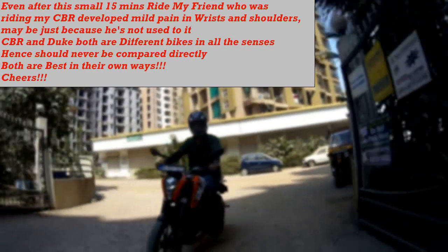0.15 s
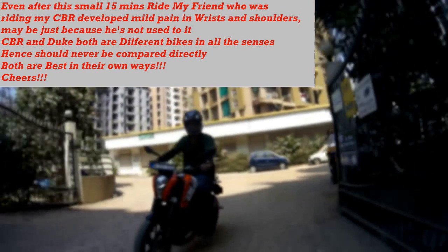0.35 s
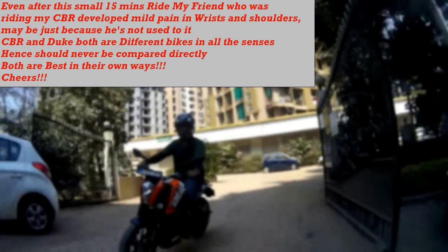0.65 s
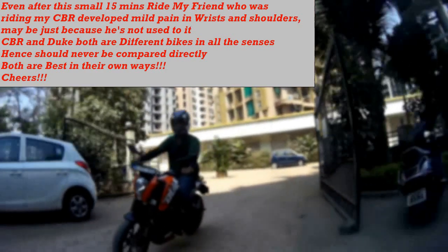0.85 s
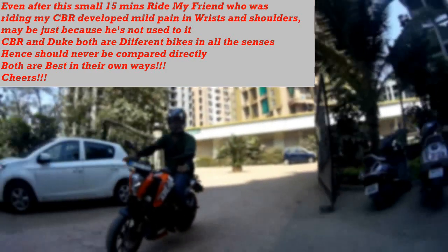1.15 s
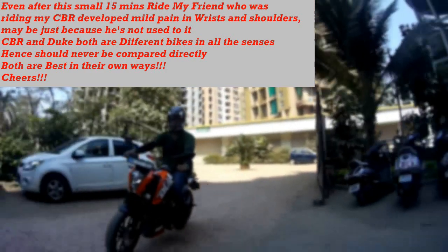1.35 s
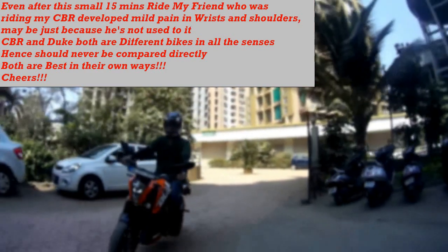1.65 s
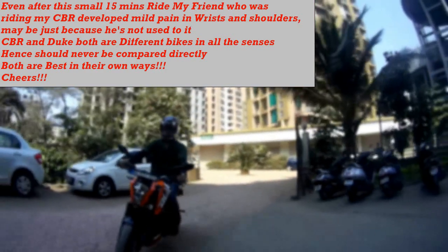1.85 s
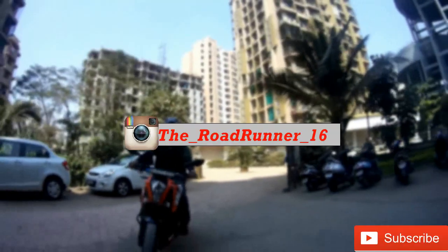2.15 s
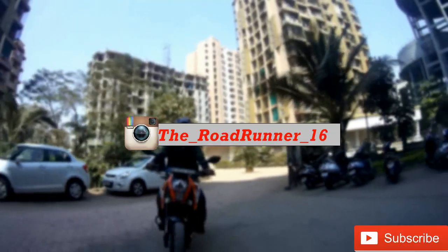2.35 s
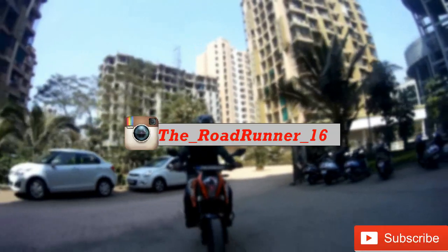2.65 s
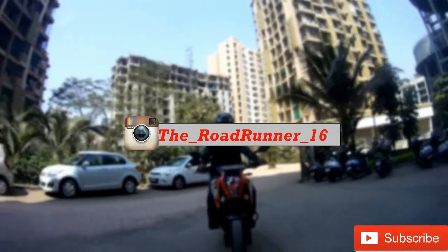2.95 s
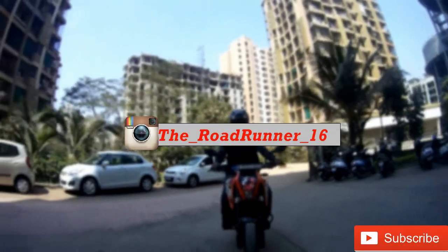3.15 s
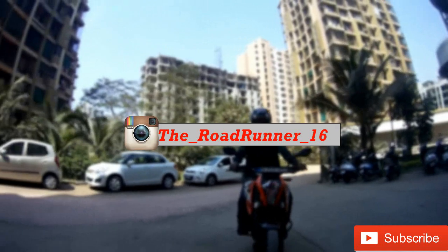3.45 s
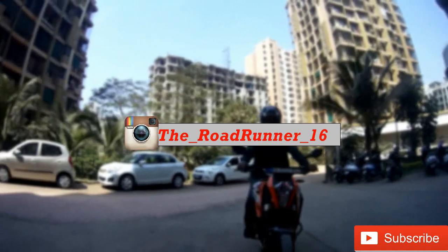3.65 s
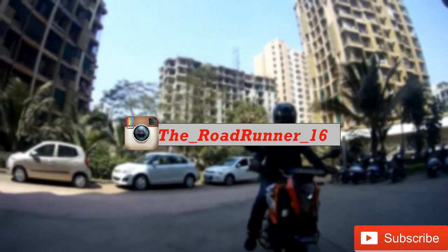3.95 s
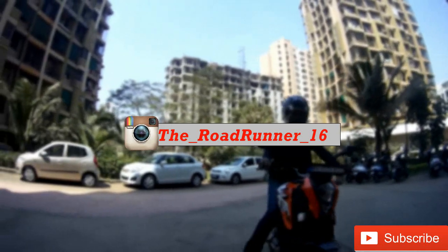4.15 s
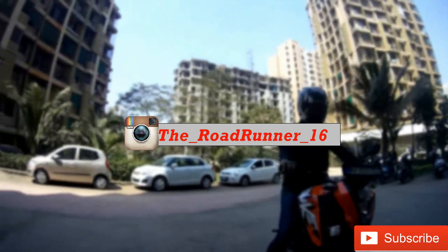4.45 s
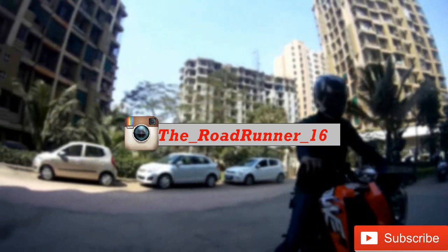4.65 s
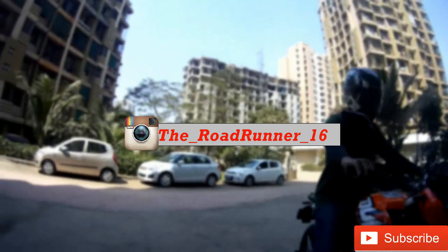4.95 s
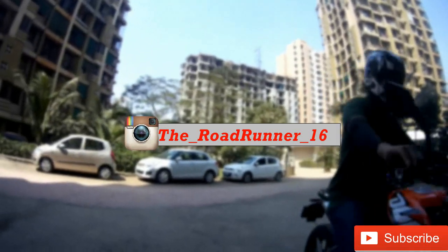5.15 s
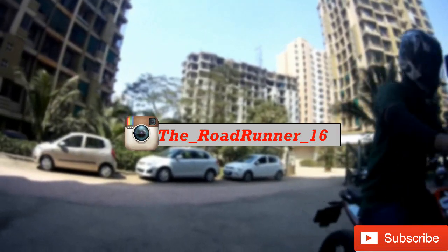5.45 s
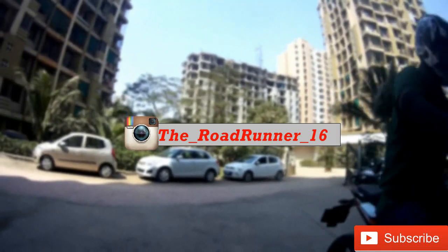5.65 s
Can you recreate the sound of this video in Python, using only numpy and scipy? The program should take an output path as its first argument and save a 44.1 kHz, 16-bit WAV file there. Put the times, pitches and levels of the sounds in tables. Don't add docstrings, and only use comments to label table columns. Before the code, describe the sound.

Very close, dull and boxy engine sound outdoors. Light throttle gives a full, rapid low drone with rattly buzz; the throttle closes and a smooth hum glides downward. Then a single-cylinder idle putters at under twelve beats a second, uneven in strength, with muffled mechanical clatter. Paving jolts rumble underneath, frequent at first and sparse later. Treble is weak, with only slight hiss.

```python
import sys
import numpy as np
from scipy import signal
from scipy.io import wavfile
from scipy.ndimage import uniform_filter1d

SR = 44100
rng = np.random.default_rng(int(sys.argv[2]) if len(sys.argv) > 2 else 0)


def volts(x):
    e = np.asarray(x, float) / 20
    return 10 ** e


def dump(signal):
    limited = np.clip(np.atleast_2d(signal).T, -1, 1)
    pcm = np.round(limited * 32767).astype(np.int16)
    wavfile.write(sys.argv[1], SR, pcm)


N = 255339

# (time [s], firing rate [1/s])
CRANK_SPEED = [(0.0, 26.79), (0.7, 28.33), (1.25, 19.07), (1.35, 14.94), (1.45, 12.67), (1.75, 11.99),
               (3.01, 11.44), (3.27, 11.97), (3.53, 11.3), (3.79, 11.71), (4.83, 11.41), (5.09, 11.74),
               (5.8, 11.57)]
# (time [s], share of the held opening [0-1])
THROTTLE_OPENING = [
    (0, 0.86),
    (.3, 0.89),
    (.7, 0.84),
    (1.0, 0.71),
    (1.15, 0.68),
    (1.3, 0.6),
    (1.6, 0),
    (1.9, 0.08),
    (5.79, 0.52),
]
# (time [s], level [dB])
FIRING_STRENGTH = [(0, 0.0), (1.2, -3), (1.5, 0), (2.0, 0.5), (2.6, -0.5), (3.45, -2.5), (3.8, 0),
                   (4.5, -2), (4.92, -4), (5.02, 0), (5.4, -1), (5.79, 2)]
# (frequency [Hz], sign [+-1], level [dB], t60 [s])
AIR_BOX_MODES = [(79.3, 1, -28.9, 0.397), (110.9, 1, -16.3, 0.228), (144.8, 1, -31, 0.384),
                 (200.0, -1, -13.7, 0.179), (238.2, 1, -2.8, 0.097), (250.7, -1, -4.4, 0.096),
                 (309.2, 1, -21.5, 0.197), (393.3, -1, -26.5, 0.36), (416.7, 1, -32.2, 0.4),
                 (501.5, -1, -23.5, 0.399)]
# (frequency [Hz], sign [+-1], level [dB], t60 [s])
PIPE_MODES = [(56.6, -1, -52, .4), (93.5, 1, -33.6, .34), (119, -1, -43.5, .4), (228, -1, -22, .025),
              (251, 1, -20.8, .173)]
# (frequency [Hz], sign [+-1], level [dB], t60 [s])
TAIL_MODES = [(170, -1, -35, .06), (293, 1, -27, .047), (325, 1, -37.5, .2), (364, 1, -38, .16),
              (413, -1, -28.7, .2), (473, -1, -24.4, .082), (524, -1, -41, .16), (652, -1, -50, .2),
              (955, -1, -39.5, .033), (1262, 1, -45, .07)]
# (frequency [Hz], sign [+-1], level [dB], t60 [s])
HEAD_MODES = [(1086, 1, -48.5, 0.15), (1333, -1, -43, 0.055), (2022, 1, -43, 0.015),
              (2310, -1, -45.5, 0.015), (4030, -1, -70.5, .012)]
# (frequency [Hz], width [Hz], level [dB])
CASE_MODES = [(109, 56, -8.5), (147, 13, -5.5), (194.6, 22, -3), (239.3, 19.7, 6.5), (301, 66, -6.5),
              (425.7, 62.4, 3), (501.7, 80.7, -0.5), (565, 278, -16.5), (714, 47, -8.5), (800, 70, -26.5),
              (1048.6, 133, -10), (1262, 66, -12), (1336, 56, -13.5), (1566, 180, -29.5), (1992, 222, -27),
              (2262, 94, -29.5), (2496, 180, -39.5), (2878, 44, -42), (2970, 41, -45), (3473, 130, -59.5),
              (2980, 490, -57.5), (4030, 410, -61), (4420, 100, -52.5), (5200, 250, -62.5)]
# (frequency [Hz], width [Hz])
CASE_NOTCHES = [(1165, 45), (1455, 60), (2075, 40)]
# (position [share of cycle], level over steady rush [dB], decay [share of cycle])
CLATTER_BURSTS = [
    (.92, 2, .1),
    (.09, 0, .05),
    (.41, -1, .08),
    (.97, -6, .5),
]
# (time [s], peak level [dB])
LONE_TICKS = [
    (1.1099, -49),
    (1.1887, -50),
    (1.3568, -52),
    (1.5509, -53),
    (1.5554, -54),
    (1.8801, -47),
]
# (time [s], length [s], mount rocking level [dB], frame shudder level [dB])
PAVING_JOLTS = [(.08, 0.14, -37, -34.5), (0.366, .36, -31, -40), (0.855, 0.2, -37.5, -38.5),
                (1.051, 0.25, -31.5, -33.5), (1.3, 0.2, -39, -29.5), (1.534, 0.45, -32, -27),
                (2.12, 0.22, -38, -33), (2.56, 0.37, -37, -30), (2.95, 0.44, -40, -32.5),
                (3.505, 0.2, -51, -41), (4.55, 0.15, -51, -43), (5.0, 0.17, -57, -39)]

FIRST_FIRING = -.085
IDLE_PER_S = 11.6
RUN_IN = 8000
INTAKE_LEAD_S, VALVE_LEAD_S, KNOCK_LEAD_S, TAIL_LEAD_S = .016, .0101, .0055, .0023
DRONE_IDLE_DB, DRONE_OPEN_DB = -45.5, 7.5
BUZZ_IDLE_DB, BUZZ_OPEN_DB = -82.5, -49
EXHAUST_IDLE_DB, EXHAUST_DB_PER_OCTAVE = -2.5, 3.5
SMOOTHED_DB, SMOOTHED_FROM = -16, .72
CLATTER_IDLE_DB, CLATTER_DB_PER_OCTAVE = -37, 2.5
CLATTER_FOLLOWS = 0.52
RUMBLE_IDLE_DB, RUMBLE_DB_PER_OCTAVE = -49, 15
JOLT_RISE_S, JOLT_FALL_S, JOLT_SAG_DB_PER_S = 0.014, 0.085, 11
OVERRUN_S, OVERRUN_RISE_S, OVERRUN_HOLD_S = .72, .08, 0.27
OVERRUN_DB, OVERRUN_SAG_DB_PER_S, OVERRUN_FALL_DB_PER_S = -27, 27.5, 149.5
MOUNT_HZ, MOUNT_REST_DB = 27.5, -51.5
KNOCK_S, KNOCK_DB = 1.881, -49
HISS_DB, HISS_TOP_HZ = -69.5, 14800


def rms_one(x):
    return x / np.sqrt(np.mean(x ** 2) + 1e-20)


def in_time(rows):
    s, *columns = np.transpose(rows)
    return [np.interp(np.arange(N) / SR, s, c) for c in columns]


def drift(rate):
    r = np.exp(-80 * np.pi * rate / SR)
    noise = rng.standard_normal(N // 40 + 2002)
    slow = signal.lfilter([1], [1, -2 * r, r * r], noise)[2000:]
    return np.interp(np.arange(N) / 40, np.arange(len(slow)), rms_one(slow))


def ring(clicks, hz, t60):
    r = volts(-60 / (t60 * SR))
    w = 2 * np.pi * hz / SR
    return signal.lfilter([0, np.sin(w)], [1, -2 * r * np.cos(w), r * r], clicks + 1e-18)


def resonate(x, hz, width_hz):
    r = np.exp(-np.pi * width_hz / SR)
    zeros = np.array([1, 0, -1]) * (1 - r * r) / 2
    return signal.lfilter(zeros, [1, -2 * r * np.cos(2 * np.pi * hz / SR), r * r], x)


def cut(x, hz, kind, order=2):
    return signal.sosfilt(signal.butter(order, hz, kind, fs=SR, output="sos"), x)


def struck(modes, at, level_db, shared_db, own_db):
    out = np.zeros(N + RUN_IN)
    chance = rng.standard_normal((len(at), len(modes) + 1))
    blow_db = level_db[np.maximum(at, 0)] + shared_db * chance[:, -1]
    for k, (hz, sign, db, t60) in enumerate(modes):
        clicks = np.zeros(N + RUN_IN)
        clicks[at + RUN_IN] = np.sign(sign) * volts(db + blow_db + own_db * chance[:, k])
        out += ring(clicks, hz, t60)
    return out[RUN_IN:]


def load(per_s):
    (opening,), (firing_db,) = in_time(THROTTLE_OPENING), in_time(FIRING_STRENGTH)
    opening = np.clip(opening, 0, 1)
    octaves = np.log2(per_s / IDLE_PER_S)
    flowing = np.clip((opening - SMOOTHED_FROM) / (1 - SMOOTHED_FROM), 0, 1)
    exhaust_db = EXHAUST_IDLE_DB + EXHAUST_DB_PER_OCTAVE * octaves + SMOOTHED_DB * flowing + firing_db
    drone_db = DRONE_IDLE_DB + (DRONE_OPEN_DB - DRONE_IDLE_DB) * opening
    rumble_db = RUMBLE_IDLE_DB + RUMBLE_DB_PER_OCTAVE * octaves
    clatter_db = CLATTER_IDLE_DB + CLATTER_DB_PER_OCTAVE * octaves + CLATTER_FOLLOWS * firing_db
    buzz_db = BUZZ_IDLE_DB + (BUZZ_OPEN_DB - BUZZ_IDLE_DB) * opening ** 2
    return exhaust_db, drone_db, rumble_db, clatter_db, buzz_db


def preamp_hiss(shape):
    return volts(HISS_DB) * cut(rng.standard_normal(shape), HISS_TOP_HZ, "low", order=4)


def jolts():
    t, out = np.arange(N) / SR, 0
    for s, length, rocking_db, shudder_db in PAVING_JOLTS:
        shape = np.interp(t - s, [0, JOLT_RISE_S, length, length + JOLT_FALL_S], [0, 1, 1, 0])
        sag = volts(-JOLT_SAG_DB_PER_S * (t - s) * (shape > 0))
        out = out + volts(np.array([[rocking_db], [shudder_db]])) * shape * sag
    return out


def mount_rocking(gain):
    rocking = np.sin(2 * np.pi * np.cumsum(MOUNT_HZ * (1 + 0.022 * drift(5.6))) / SR)
    rumble = rms_one(cut(cut(rng.standard_normal(N), 22, "high"), 95, "low"))
    return (volts(MOUNT_REST_DB) + gain) * (1.16 * rocking + 0.71 * rumble)


def frame_rumble(gain):
    noise = rng.standard_normal(N) * volts(2.5 * drift(8))
    shudder = resonate(noise, 115, 44) - 0.68 * resonate(noise, 190, 60) + 0.79 * resonate(noise, 245, 60)
    return gain * rms_one(cut(shudder, 350, "low", order=4))


def lone_ticks():
    clicks = np.zeros(N)
    for s, peak_db in LONE_TICKS:
        clicks[round(s * SR)] = volts(peak_db + 3)
    puffs = signal.lfilter([1], [1, -.985], clicks) * rng.standard_normal(N)
    knock = volts(KNOCK_DB) * ring(np.arange(N) == round(KNOCK_S * SR), hz=2850, t60=0.056)
    return 1.5 * resonate(puffs, 4300, 1500) + .2 * cut(puffs, 5000, "high") + knock


def buzz(cycles, buzz_db):
    touches = np.diff(np.floor(4 * cycles + .08 * drift(30)), prepend=0) != 0
    clicks = touches * volts(buzz_db + 13 + 3.5 * rng.standard_normal(N))
    grit = signal.lfilter([1], [1, -.96], clicks) * rng.standard_normal(N)
    specks = rng.standard_normal(N) * (rng.random(N) < 6000 / SR)
    rasp = volts(buzz_db + 5) * specks + .45 * grit
    broad = cut(cut(grit, 2600, "high"), 9000, "low")
    low_rasp = cut(cut(rasp, 1450, "high"), 3000, "low", order=3)
    ring_rasp = resonate(rasp, 4380, 160)
    bright = resonate(grit, hz=7050, width_hz=1200)
    return .5 * broad + 6.7 * low_rasp + 6.2 * ring_rasp + 0.74 * bright


def clatter(cycles, clatter_db):
    gate = np.ones(N)
    for share, db, decay in CLATTER_BURSTS:
        strength = volts(db + 0.66 * rng.standard_normal(int(cycles[-1]) + 3))
        since = cycles + 1 - share
        gate += strength[since.astype(int)] * np.exp(-(since % 1) / decay)
    gate = uniform_filter1d(gate, size=130)
    sizes = volts(1.98 * np.minimum(rng.exponential(1, N), 5)) * rng.choice([-1, 1], N)
    knocks = sizes * (rng.random(N) < 260.0 * np.gradient(cycles))
    heard = np.zeros(N)
    for k, (hz, width_hz, db) in enumerate(CASE_MODES):
        bunched = knocks * gate ** np.clip(hz / 800 - .6, .1, 1)
        gain = (-1) ** k * volts(db + 1.03 * drift(5.8))
        heard += gain * resonate(resonate(bunched, hz, 2.64 * width_hz), hz, 0.9 * width_hz)
    for hz, width_hz in CASE_NOTCHES:
        heard = heard - .75 * resonate(heard, hz, width_hz)
    return volts(clatter_db + 10.0) * rms_one(heard)


def overrun(cycles):
    since = np.arange(N) / SR - OVERRUN_S
    sag_db = OVERRUN_SAG_DB_PER_S * np.maximum(since - OVERRUN_RISE_S, 0)
    fall_db = OVERRUN_FALL_DB_PER_S * np.maximum(since - OVERRUN_RISE_S - OVERRUN_HOLD_S, 0)
    rise = np.clip(since / OVERRUN_RISE_S, 0, 1) ** 2
    return rise * volts(OVERRUN_DB - sag_db - fall_db + 3) * np.sin(8 * np.pi * cycles)


def firings(cycles, exhaust_db, drone_db, clatter_db):
    fired = np.flatnonzero(np.diff(np.floor(cycles)) > 0)
    earlier = fired[0] - (fired[1] - fired[0]) * np.arange(4, 0, -1)
    fired = np.r_[earlier, fired]
    drone = struck(AIR_BOX_MODES, fired - round(INTAKE_LEAD_S * SR), drone_db, shared_db=1.1, own_db=.6)
    pipe = struck(PIPE_MODES, fired - round(VALVE_LEAD_S * SR), exhaust_db, shared_db=1.3, own_db=.6)
    tail = struck(TAIL_MODES, fired - round(TAIL_LEAD_S * SR), exhaust_db + 4.5, shared_db=1.3, own_db=.8)
    head = struck(HEAD_MODES, fired - round(KNOCK_LEAD_S * SR), clatter_db + 41, shared_db=2.0, own_db=2.0)
    gas = cut(cut(drone, 62, "high") + pipe + tail, 1500, "low", order=4)
    return gas + cut(cut(head, 800, "high"), 2600, "low")


def scene():
    per_s, = in_time(CRANK_SPEED)
    cycles = FIRST_FIRING + 1 + np.cumsum(per_s) / SR
    exhaust_db, drone_db, rumble_db, clatter_db, buzz_db = load(per_s)
    rocking, shudder = jolts()
    frame = mount_rocking(rocking) + frame_rumble(np.hypot(volts(rumble_db), shudder))
    loose = lone_ticks() + buzz(cycles, buzz_db)
    engine = clatter(cycles, clatter_db) + overrun(cycles) + firings(cycles, exhaust_db, drone_db, clatter_db)
    return (frame + loose + engine)[None]


def roll_off(x):
    return signal.sosfilt(signal.butter(12, 15750, fs=SR, output="sos"), x)


def record(dry):
    rounded = 1.5 * np.tanh(dry / 1.5)
    return roll_off(rounded + preamp_hiss(dry.shape))


dry = scene()
out = record(dry)
dump(out)
```